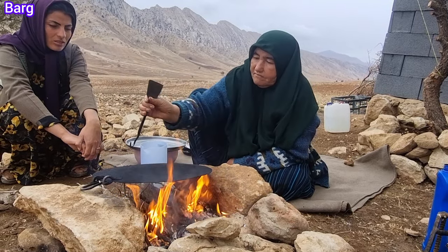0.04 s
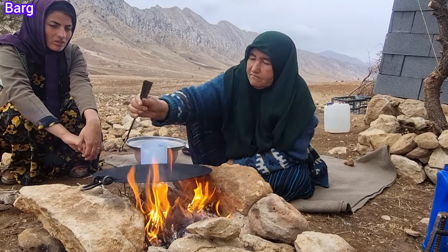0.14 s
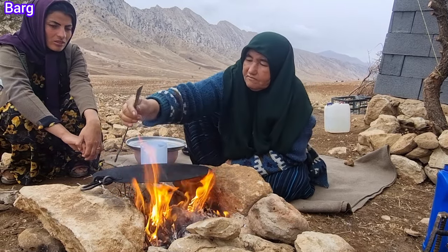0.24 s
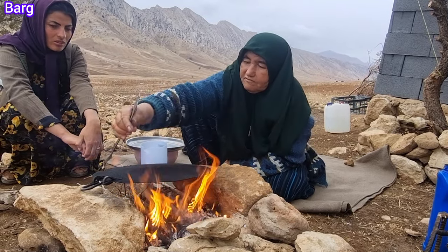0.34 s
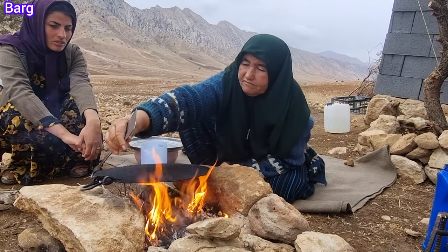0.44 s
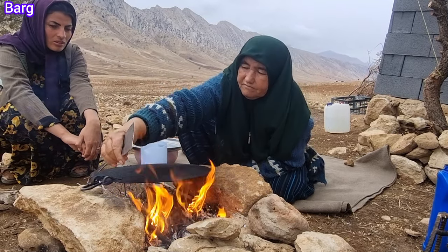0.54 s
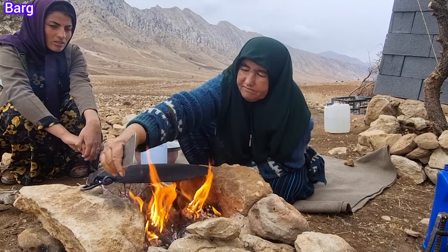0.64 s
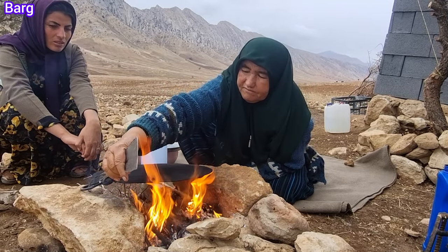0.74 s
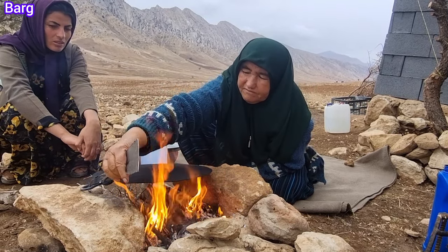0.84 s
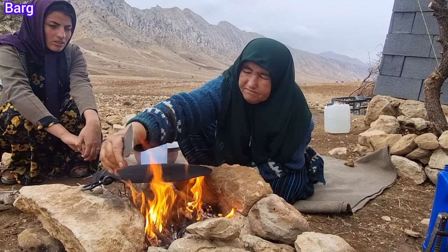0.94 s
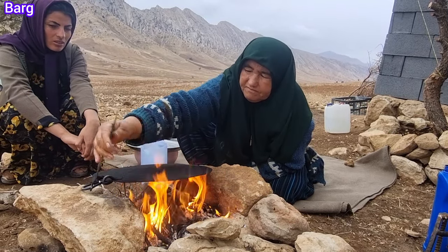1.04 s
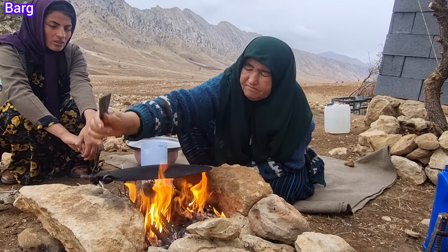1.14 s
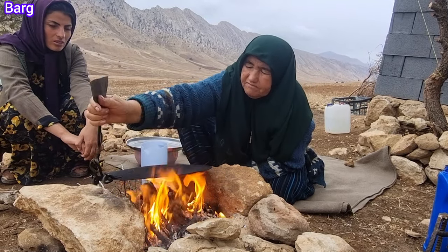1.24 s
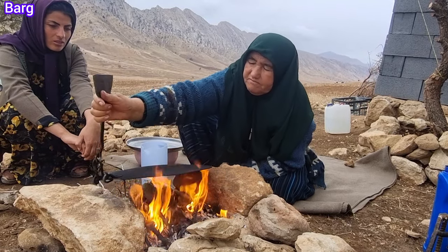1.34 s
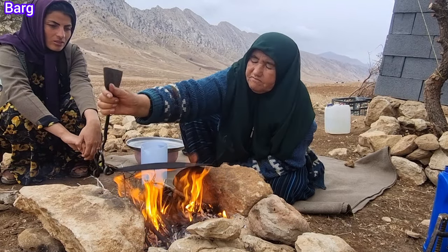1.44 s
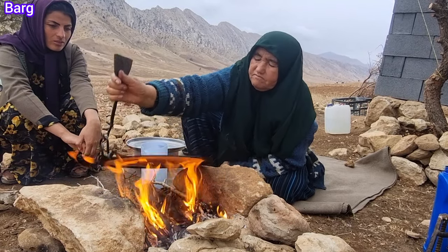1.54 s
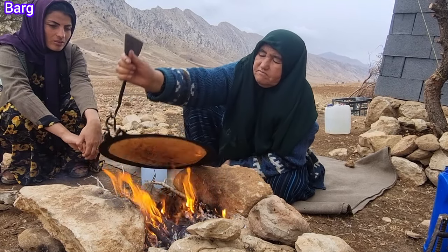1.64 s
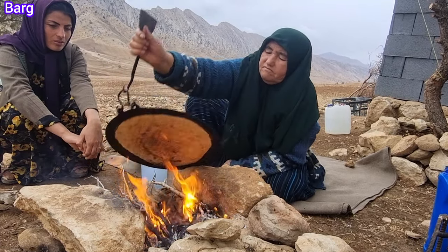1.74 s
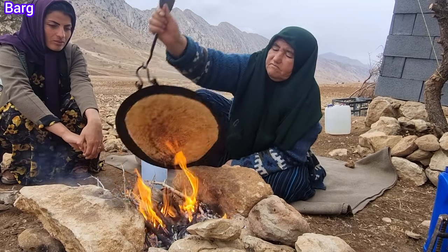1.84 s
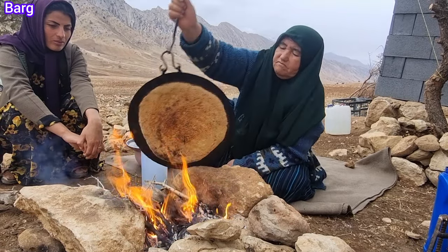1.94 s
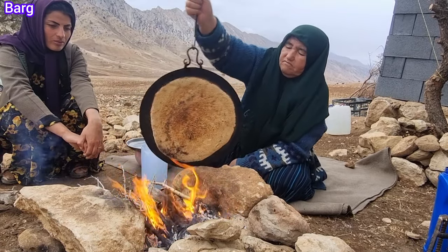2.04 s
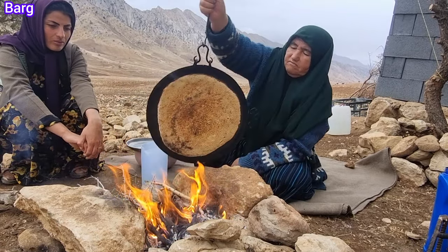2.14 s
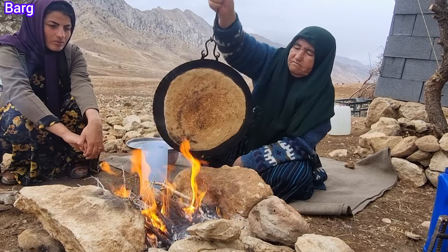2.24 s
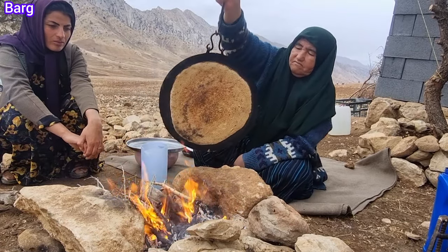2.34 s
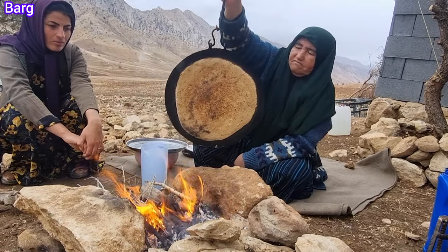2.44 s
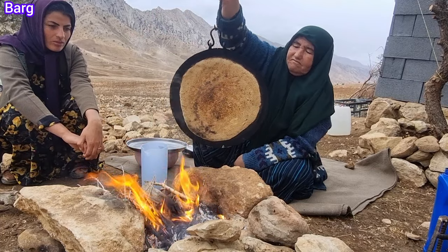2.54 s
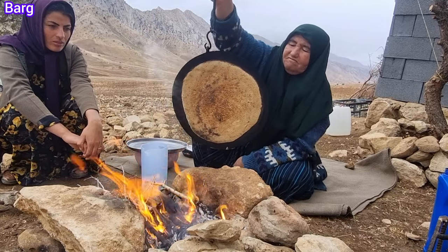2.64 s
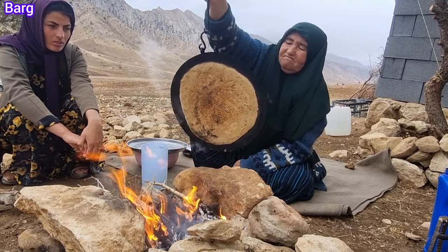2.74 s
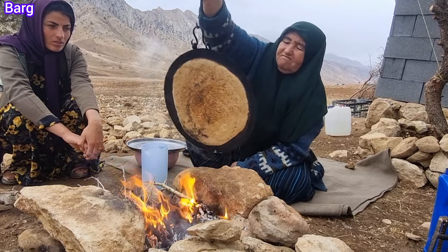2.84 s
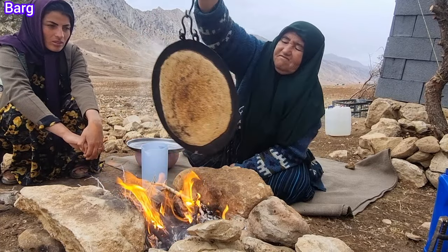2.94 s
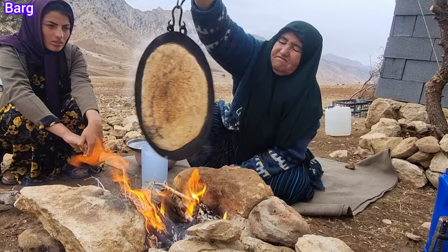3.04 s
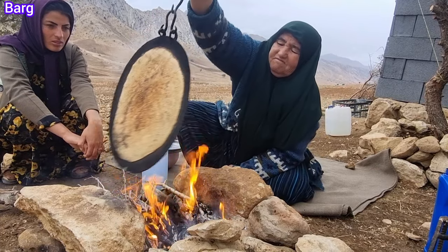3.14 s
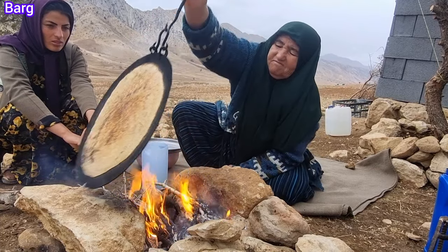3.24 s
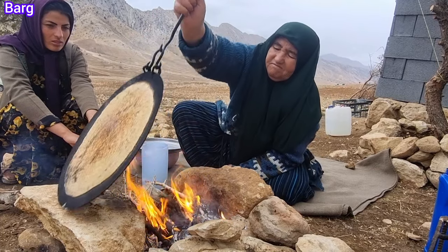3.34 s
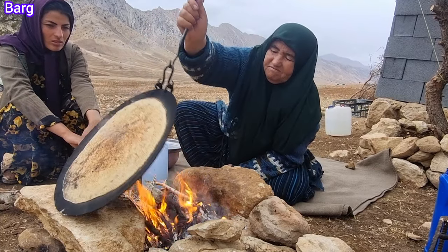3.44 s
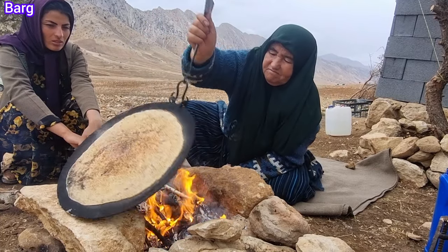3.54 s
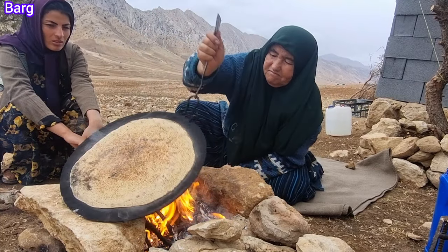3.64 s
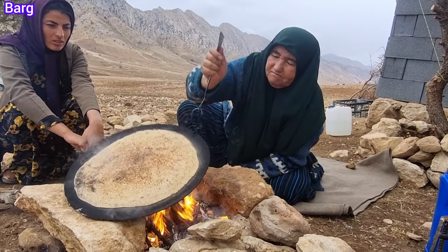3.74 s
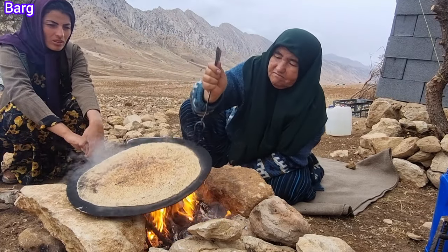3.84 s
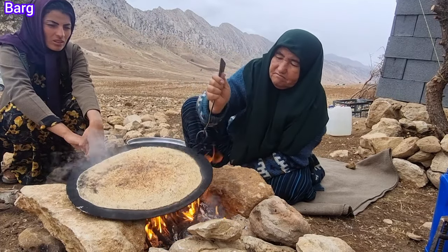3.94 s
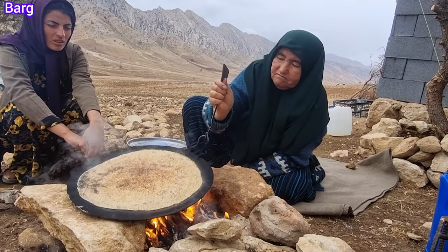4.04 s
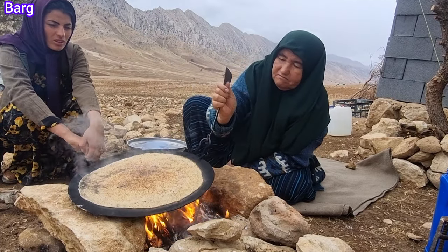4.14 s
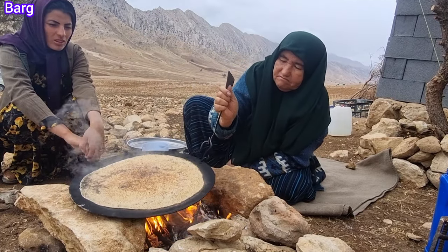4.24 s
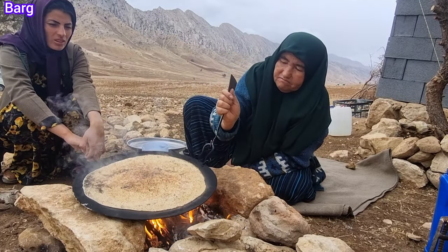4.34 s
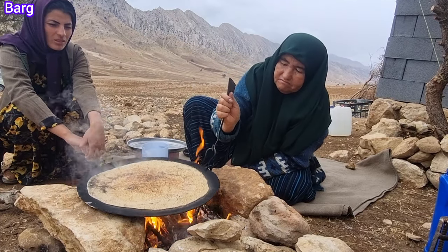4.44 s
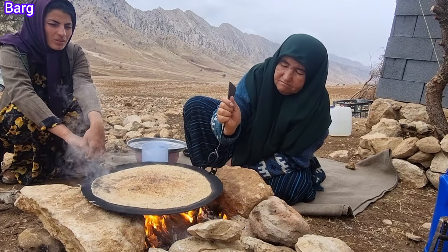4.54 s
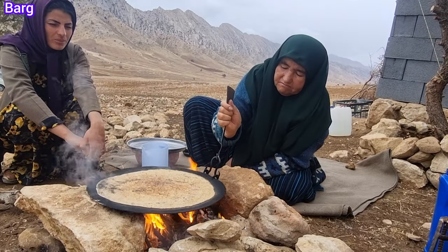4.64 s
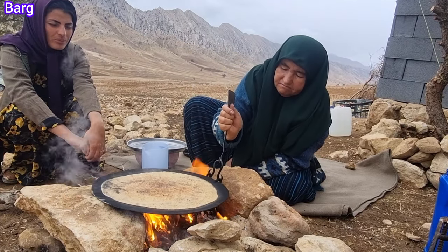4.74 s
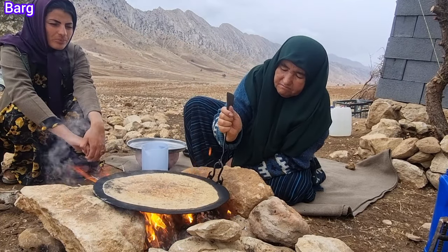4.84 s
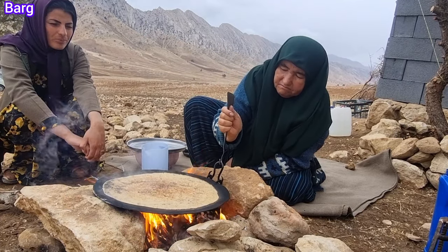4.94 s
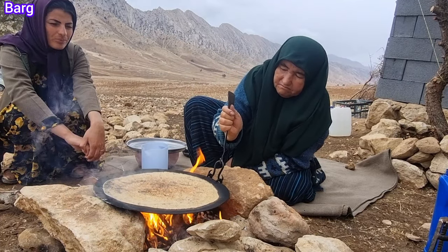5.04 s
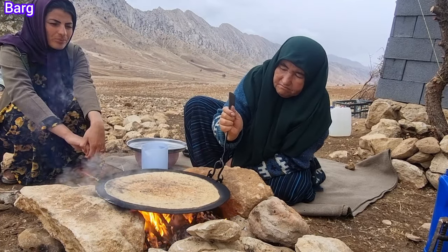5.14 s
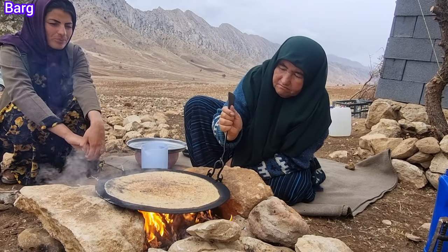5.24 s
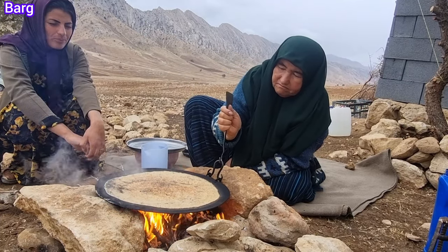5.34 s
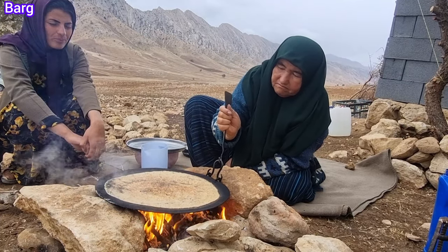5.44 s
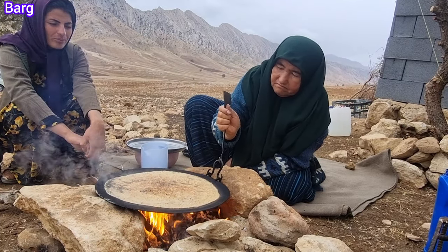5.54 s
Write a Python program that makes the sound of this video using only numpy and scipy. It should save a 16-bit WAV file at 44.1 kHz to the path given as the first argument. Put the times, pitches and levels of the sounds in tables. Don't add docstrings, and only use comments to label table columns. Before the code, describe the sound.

Outdoors by a fluttering wood fire, a metal spatula taps an iron griddle, which is lifted, clanked onto stones and dragged with gritty scrapes.

```python
import sys
import numpy as np
from scipy import signal
from scipy.fft import rfft, irfft
from scipy.io import wavfile
from scipy.ndimage import uniform_filter1d

SR = 44100
rng = np.random.default_rng(int(sys.argv[2]) if len(sys.argv) > 2 else 0)


def how_loud(loudness_db):
    steps = np.asarray(loudness_db, float) / 20
    return 10 ** steps


def digitize_waveform(pressure):
    field = np.atleast_2d(pressure).T
    bounded = np.clip(field, -1, 1)
    quanta = np.round(bounded * 32767).astype(np.int16)
    wavfile.write(sys.argv[1], SR, quanta)


N = 246959
SIZE = 8192
LEAD_S = 0.0001601
AIR_DB = -73.5

# frequency in Hz, gain in dB.
AIR_TONE = [(210, -33), (350, -2.5), (771, -9), (1380, -4.5), (1570, -10), (1750, -2.5), (3140, -9.5),
            (3870, -2.5), (4540, -1.5), (5880, -11.5), (7020, -1.5), (8940, -7), (13000, -3), (15500, -2.5),
            (16500, -20.5)]
# time in seconds, flutter in dB, upper flutter in dB over it.
FLAME_LEVELS = [(0.0, -57, -14.5), (0.19, -66.5, -11), (0.53, -60, -8.5), (0.54, -60, -11), (0.86, -63, -5),
                (0.95, -50.5, -7.5), (1.2, -70, -2.5), (1.25, -64, -8), (1.36, -51.5, -12.5),
                (1.39, -61.5, -6), (1.73, -51, -6), (1.76, -47, -28), (1.81, -72, 6), (1.93, -51, -3.5),
                (1.98, -55, -2), (2.03, -53, -10), (2.12, -77, -1), (2.18, -62, -10), (3.1, -60, -7.5),
                (3.18, -45.5, -17), (3.34, -62, -14), (3.43, -46, 6), (3.7, -54.5, -4), (3.74, -43, -28),
                (3.84, -52.5, -3.5), (4.02, -57.5, -12), (4.09, -63, -6.5), (4.18, -54, -10),
                (4.46, -63, -10.5), (4.57, -53.5, -8), (4.74, -61.5, 3), (4.85, -54, -13),
                (5.12, -77, -8.5), (5.21, -57.5, 2.5), (5.26, -57, -15), (5.32, -63, 15), (5.35, -57, -8),
                (5.41, -77, -1), (5.54, -63, -17), (5.6, -69, -3)]
# frequency in Hz, gain in dB.
FLUTTER_TONE = [(15, -35.5), (25, -22.5), (46, -1.5), (92, -0.5), (177, -6), (211, -11.5), (284, -12.5),
                (322, -29), (500, -32), (650, -53.5), (1100, -120)]
# start in seconds, peak in dB, centre in Hz, decay t60 in seconds.
EMBER_TICKS = [
    (0.4667, -51.5, 8310, 0.015),
    (0.6337, -45.5, 6800, 0.015),
    (0.7958, -50.5, 6620, 0.015),
    (0.8341, -36, 12000, 0.012),
    (1.1335, -52, 7020, 0.014),
    (2.1189, -35.5, 12200, 0.015),
    (2.588, -44.5, 10400, 0.014),
    (2.6192, -55.5, 7430, 0.015),
    (2.9755, -55, 2690, 0.012),
    (4.2296, -55, 13700, 0.015),
]
# time in seconds, grit in dB, plate in dB over grit, top in dB over grit.
DRAG_STROKES = [
    [(0.56, -82, 26, 21), (0.58, -74, 30, -9), (0.62, -74, 4, -8)],
    [(1.16, -73.5, 9, -5), (1.242, -80.5, 39, 13.5), (1.34, -76.5, 13.5, -21)],
    [(1.49, -82.5, -11, -8), (1.584, -65.5, 9, -5.5), (1.64, -79, -3, -3)],
    [(1.88, -70.5, 5, -1), (1.914, -64.5, 10.5, -7), (2.054, -73, 20, -7), (2.11, -76, 8, -10)],
    [(3.26, -93, -14, -7), (3.286, -86.5, 22, 2), (3.34, -86, 13, -11)],
    [(3.43, -78, 35, 29), (3.458, -80, 37.5, -6.5), (3.59, -46, 8, -11.5), (3.708, -55.5, 7, -7.5),
     (3.838, -73.5, 27.5, -6), (4.02, -77, 6, -10.5)],
    [(4.28, -76, -2, -5), (4.34, -69, 13.5, -5), (4.556, -65, 6.5, -13.5), (4.672, -66, 16, -13),
     (4.836, -69, 13.5, -10), (4.9, -83, -3, -15)],
    [(5.12, -85, -3, -1.5), (5.168, -73, 15.5, -8), (5.356, -92, 18, 2), (5.39, -77, 5, -12)],
]
# frequency in Hz, gain in dB.
STONE_TONE = [(820, -28), (1400, -7.5), (2260, -1), (2480, 2.5), (2690, -5), (2950, 4), (3720, -1.5),
              (5160, -4), (5660, -8), (8000, -6), (8590, -7.5), (12200, -20.5), (16000, -23)]
# frequency in Hz, gain in dB.
PLATE_TONE = [(120, -34), (200, -14.5), (253, -3), (340, -23.5), (465, 0), (573, -0.5), (664, -3),
              (878, -5), (1030, -1), (1240, -8), (1600, -9), (2080, -38), (3520, -120)]
# frequency in Hz, level in dB, decay t60 in seconds.
PLATE_MODES = [(154.7, -3, .12), (251.8, -4.5, 0.18), (434, -15, 0.052), (649, -3, .1), (729.6, -2.5, 0.14),
               (830, -2, 0.12), (1016, -3, 0.089), (1099, -4, 0.12)]
# start in seconds, peak in dB, strongest mode in Hz, push in seconds,
# decay t60 in seconds.
PLATE_THUDS = [(0.554, -42.5, 615, 0.0092, 0.06), (0.703, -70, 353, 0.008, 0.07),
               (0.711, -57, 734, 0.008, 0.07), (0.741, -46.5, 1190, 0.0093, 0.079),
               (0.938, -42, 1193, 0.0077, 0.086), (0.955, -29.5, 1114, 0.0066, 0.093),
               (1.185, -41, 1104, 0.0053, 0.098), (1.244, -29, 1100, 0.01, 0.086),
               (1.311, -48, 1110, 0.01, 0.07), (1.828, -57, 440, 0.0064, 0.093),
               (1.903, -46.5, 630, 0.0064, 0.095), (1.961, -44, 1250, 0.0057, 0.11),
               (1.974, -39, 1147, 0.0066, 0.045), (2.009, -50, 575, 0.008, 0.07),
               (2.033, -37.5, 615, 0.0054, 0.074), (2.117, -58, 1170, 0.0059, 0.058),
               (3.165, -63.5, 596, 0.0093, 0.059), (3.28, -55.5, 499, 0.0092, 0.075),
               (3.422, -23.5, 725, 0.0076, 0.084), (3.478, -50, 729, 0.008, 0.062),
               (3.51, -27, 730, 0.011, 0.068), (3.567, -35.5, 1000, 0.0065, 0.1),
               (3.768, -38, 1054, 0.0074, 0.063), (3.814, -42, 517, 0.008, 0.07),
               (3.844, -31.5, 763, 0.0097, 0.07), (4.135, -62, 473, 0.0069, 0.068),
               (4.325, -54.5, 880, 0.008, 0.077), (4.444, -53, 640, 0.01, 0.07),
               (4.46, -49.5, 823, 0.008, 0.094), (4.6, -47, 508, 0.01, 0.08),
               (4.656, -53, 480, 0.0069, 0.085), (4.722, -47, 450, 0.008, 0.079),
               (4.786, -54, 893, 0.008, 0.07), (4.828, -58, 815, 0.0073, 0.057),
               (5.166, -59.5, 412, 0.008, 0.07), (5.201, -43, 419, 0.0073, 0.088),
               (5.232, -39.5, 494, 0.0084, 0.046), (5.301, -44, 430, 0.0086, 0.049),
               (5.315, -42, 480, 0.01, 0.12), (5.332, -32, 431, 0.012, 0.067)]
# frequency in Hz, level in dB, decay t60 in seconds.
BLADE_MODES = [(1098, -40, 0.075), (3677, -34.5, 0.23), (5800, -37, 0.036), (6500, -55, .1),
               (8800, -31.5, 0.023), (15070, -43, 0.11)]
# start in seconds, level in dB.
BLADE_HITS = [
    (.952, 1.5),
    (.553, -14),
    (1.245, -12.5),
    (5.138, -25.5),
]
# start in seconds, peak in dB, top band in dB, hold in seconds, decay t60 in seconds,
# left minus right in dB.
STONE_HITS = [(3.279, -63, -10, 0.006, 0.06, -7), (3.4202, -17, -22.5, 0.0071, 0.049, -3.5),
              (3.425, -24.5, -30, 0.0054, 0.06, 4), (3.473, -42, -21, 0.006, 0.086, -6),
              (3.514, -34.5, -24, 0.0077, 0.096, -3.5), (3.5643, -29.5, -17.5, 0.0044, 0.066, -7.5),
              (3.5757, -26.5, -13.5, 0.0057, 0.035, -5), (3.626, -45.5, -10, 0.0051, 0.06, -4),
              (3.7194, -42, -10, 0.006, 0.06, 1), (3.7675, -27.5, -15.5, 0.004, 0.05, -1.5),
              (3.8174, -44.5, -25, 0.006, 0.053, 5), (3.8403, -36, -30, 0.0052, 0.068, -17),
              (4.322, -56.5, -18, 0.006, 0.067, 7), (4.355, -55, -23, 0.006, 0.06, -1.0),
              (4.4665, -49, -20, 0.0056, 0.084, -14), (4.581, -56, -22, 0.006, 0.053, -7),
              (4.5979, -47.5, -30, 0.006, 0.054, -11), (4.6688, -46.5, -20, 0.0053, 0.1, -5),
              (4.692, -52, -17, 0.006, 0.06, -5), (4.74, -50.5, -17, 0.006, 0.072, -5),
              (4.788, -56.5, -18, 0.0054, 0.06, -13), (5.139, -59, -14, 0.006, 0.06, 3.5),
              (5.1993, -47.5, -16.5, 0.0043, 0.068, -4.5), (5.2943, -43.5, -17, 0.0053, 0.06, -2),
              (5.322, -52.5, -22, 0.006, 0.082, -5)]
# frequency in Hz, gain in dB.
STEEL_TONE = [(820, -40), (1400, -34), (1810, -5), (2330, -3), (2660, -10), (3040, 5.5), (3400, -8.5),
              (4340, -5.5), (7150, -7.5), (8330, -1), (9420, -10), (10400, -10), (16000, -15)]
# start in seconds, peak in dB, top band in dB, hold in seconds, decay t60 in seconds,
# left minus right in dB.
STEEL_HITS = [(0.5519, -25.5, -10.5, 0.0065, 0.039, 1.5), (0.5654, -41, -20.5, 0.0066, 0.068, 4),
              (0.7414, -45.5, -15.5, 0.0075, 0.061, -16), (0.767, -56, -23, 0.0068, 0.073, -7),
              (0.9363, -20, -10, 0.0056, 0.057, -1.5), (0.9477, -16.5, -12, 0.0065, 0.039, 1.5),
              (0.9542, -23.5, -13.5, 0.004, 0.043, 2.5), (1.1795, -40, -18, 0.006, 0.073, -5),
              (1.2106, -45, -28.5, 0.0047, 0.05, 6), (1.2282, -35.5, -20, 0.0048, 0.067, -9),
              (1.2428, -17.5, -20.5, 0.0066, 0.044, -6), (1.252, -27, -34, 0.0072, 0.039, 2.5),
              (1.3104, -40.5, -17, 0.006, 0.05, 0.5), (1.5045, -55, -12, 0.0095, 0.061, 1.5),
              (1.548, -53, -11, 0.006, 0.064, -7), (1.578, -58, -9, 0.0053, 0.05, 11),
              (1.897, -44, -4, 0.0066, 0.059, -11.5), (1.905, -42.5, -11, 0.0048, 0.046, 4),
              (1.9654, -39, -20.5, 0.012, 0.093, -18.5), (1.972, -43.5, -29, 0.0045, 0.047, -7.5),
              (2.03, -53, -26, 0.006, 0.056, -4)]


def unit(x):
    return x / np.sqrt(np.mean(x ** 2))


def gains(tone, n):
    hz, db = np.transpose(tone)
    bins = np.log(np.fft.rfftfreq(n, 1 / SR) + 1)
    return how_loud(np.interp(bins, np.log(hz), db))


def colour(x, gain):
    n = x.shape[-1]
    cepstrum = irfft(np.log(gain + 1e-9), n)
    cepstrum[1:n // 2] *= 2
    cepstrum[n // 2 + 1:] = 0
    return irfft(rfft(x) * np.exp(rfft(cepstrum)), n)


def ports(x, pan_db=0, alike=1.):
    n = x.shape[-1]
    both = np.sqrt(alike) * x[0] + np.sqrt(1 - alike) * x[1:]
    delay = np.exp(-2j * np.pi * np.fft.rfftfreq(n, 1 / SR) * LEAD_S)
    both[1] = irfft(rfft(both[1]) * delay, n)
    return both * how_loud(np.array([1, -1])[:, None] * pan_db / 2)


def modes(force, table):
    total = 0
    for hz, db, t60 in table:
        pole = np.exp((2j * np.pi * hz - np.log(1000) / t60) / SR)
        total = total + how_loud(db) * signal.lfilter([1], [1, -pole], force).imag
    return total


def walk(rate, n=N):
    hold = int(SR / rate)
    steps = np.repeat(rng.standard_normal(n // 40 + 1), hold)[:n]
    return unit(uniform_filter1d(uniform_filter1d(steps, hold), hold // 2 + 1))


def grit(shape, spike_db):
    return rng.standard_normal(shape) * how_loud(spike_db * rng.exponential(size=shape))


def push(hold, t60, rise=0.0009):
    t = np.arange(SIZE) / SR
    decay = how_loud(-60 * np.maximum(t - hold, 0) / t60)
    return (1 - np.exp(-t / rise)) * decay * (t < .12)


def add(out, s, x, db):
    i = int(s * SR)
    out[:, i:i + SIZE] += (x * how_loud(db) / np.abs(x.mean(0)).max())[:, :N - i]


def air():
    hush = rng.standard_normal((3, N)) * how_loud(0.55 * walk(6.3))
    sizzle = how_loud(-12) * grit((3, N), 3.87)
    return how_loud(AIR_DB + 3.0) * ports(unit(colour(hush + sizzle, gains(AIR_TONE, N))), -.7, 0.28)


def flame():
    s, low_db, up_db = np.transpose(FLAME_LEVELS)
    t = np.arange(N) / SR
    low_db, up_db = np.interp(t, s, low_db), np.interp(t, s, up_db)
    puffs = grit((3, N), 3.07) * how_loud(3.24 * walk(25))
    tone = gains(FLUTTER_TONE, N)
    low = unit(colour(puffs, tone * gains([(120, -5), (190, -23.5)], N)))
    up = unit(colour(puffs * how_loud(3.0 * walk(40)), tone * gains([(120, -23), (190, -0.5)], N)))
    return ports(how_loud(low_db) * low, 2.3, 0.95) + ports(how_loud(low_db + up_db) * up, 1.3, 0.94)


def ticks():
    out = np.zeros((2, N))
    for s, db, hz, t60 in EMBER_TICKS:
        band = gains([(hz / 6, -30), (hz / 2, -8), (hz, 0), (hz * 2.5, -5)], SIZE)
        spit = grit((3, SIZE), 1.9) * push(0, t60, rise=.0002)
        add(out, s - .0005, ports(colour(spit, band), -7.5, .9), db)
    return out


def drags():
    rows = []
    for stroke in DRAG_STROKES:
        rows += [(stroke[0][0] - .01, -110, 0, 0), *stroke, (stroke[-1][0] + .02, -110, 0, 0)]
    s, *levels = np.transpose(rows)
    grit_db, plate_db, top_db = (np.interp(np.arange(N) / SR, s, level) for level in levels)
    force = grit((3, N), 2.9) * how_loud(2.44 * walk(45) + 1.97 * walk(160))
    tone = gains(STONE_TONE, N)
    low = unit(colour(force, tone * gains([(8500, 4), (9500, -33)], N)))
    top = unit(colour(force, tone * gains([(8500, -45), (9500, -1)], N)))
    hiss = ports(how_loud(grit_db + 5.5) * (low + how_loud(top_db) * top), -1.5, 0.7)

    force = force * how_loud(2.5 * walk(30))
    rattle = unit(colour(force, gains(PLATE_TONE, N)))
    plate = unit(rattle + how_loud(-4) * unit(modes(force, PLATE_MODES)))
    return hiss + ports(how_loud(grit_db + plate_db - 5.0) * plate, 1.5, 0.94)


def thuds():
    out, tone = np.zeros((2, N)), gains(PLATE_TONE, SIZE)
    for s, db, hz, hold, t60 in PLATE_THUDS:
        force = grit(SIZE, 2.84) * push(hold, 0.024)
        others = [(f, d + 4.4 * rng.standard_normal(), .8 * t60 * t / .1) for f, d, t in PLATE_MODES]
        ring = unit(modes(force, [(hz, 0, t60)])) + how_loud(-9) * unit(modes(force, others))
        rattle = unit(colour(rng.standard_normal((3, SIZE)) * push(hold, t60), tone))
        add(out, s - .003, ports(ring + how_loud(-5) * rattle, 2.9, 0.94), db)
    return out


def blade():
    force = np.zeros(N)
    for s, db in BLADE_HITS:
        force[int(s * SR)] = how_loud(db)
    return ports(modes(force, BLADE_MODES)[None].repeat(3, axis=0))


def contacts(table, tone, usual_db, ring_t60, ring_db, alike):
    out = np.zeros((2, N))
    for s, db, top_db, hold, t60, pan_db in table:
        ring = how_loud(ring_db) * rng.standard_normal((3, SIZE)) * push(0, ring_t60)
        ring[:, 0] = 1
        force = grit(SIZE, 2.85) * push(hold, t60)
        sound = irfft(rfft(force) * rfft(ring), SIZE)
        top = gains([(6390, 0), (9630, top_db - usual_db)], SIZE)
        add(out, s - .0015, ports(colour(sound, gains(tone, SIZE) * top), pan_db, alike), db)
    return out


def stone():
    return contacts(STONE_HITS, STONE_TONE, usual_db=-20, ring_t60=0.028, ring_db=-11.5, alike=.85)


def steel():
    return contacts(STEEL_HITS, STEEL_TONE, usual_db=-13, ring_t60=.03, ring_db=-16, alike=0.77)


def scene():
    return air() + flame() + ticks() + drags() + thuds() + blade() + stone() + steel()


def top_cut(x):
    return signal.sosfilt(signal.butter(12, 16790, fs=SR, output="sos"), x)


def record(dry):
    return top_cut(dry)


dry = scene()
out = record(dry)
digitize_waveform(out)
```